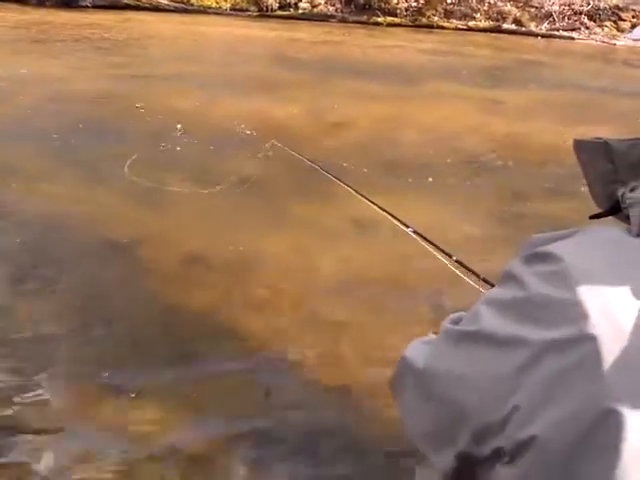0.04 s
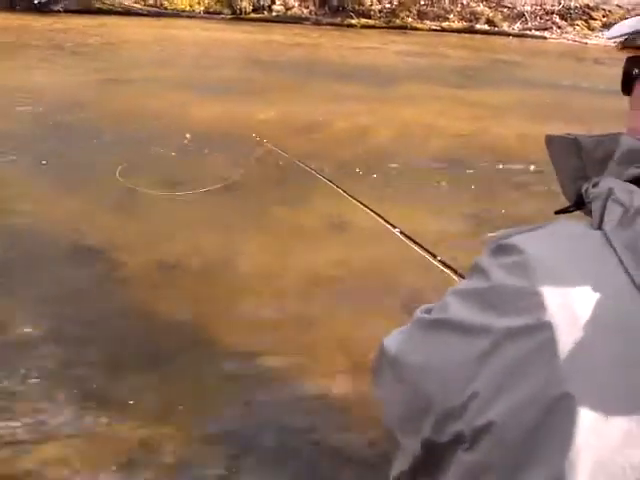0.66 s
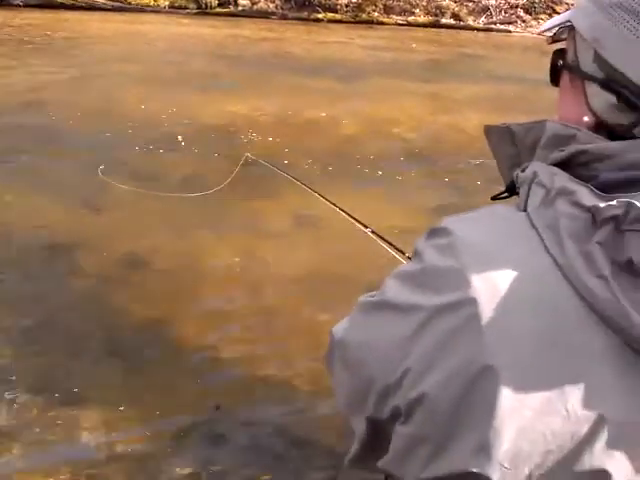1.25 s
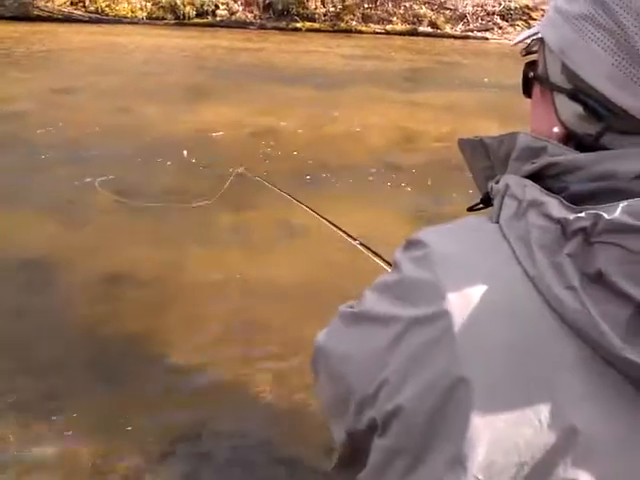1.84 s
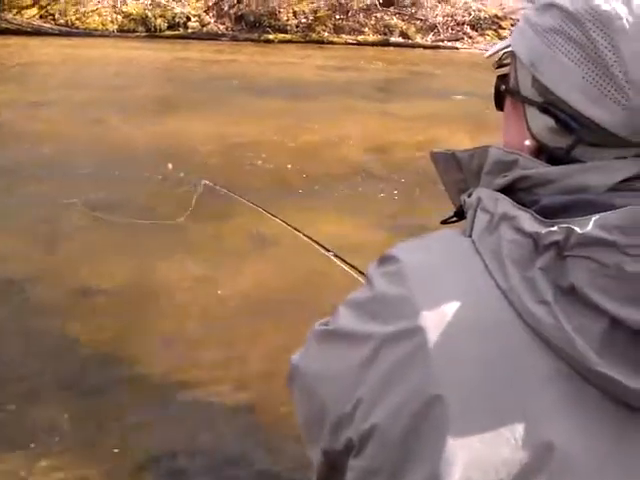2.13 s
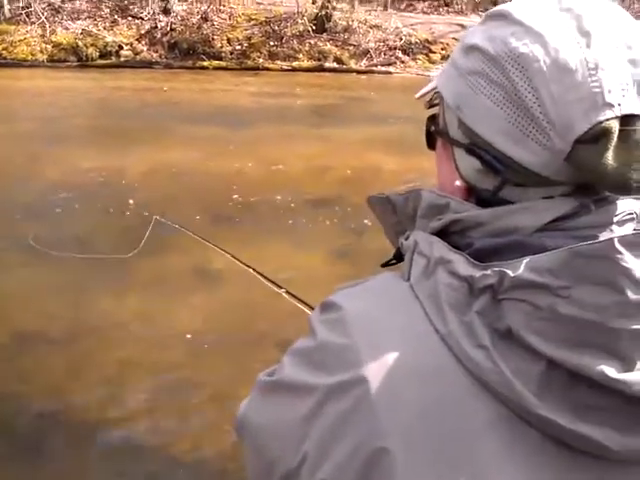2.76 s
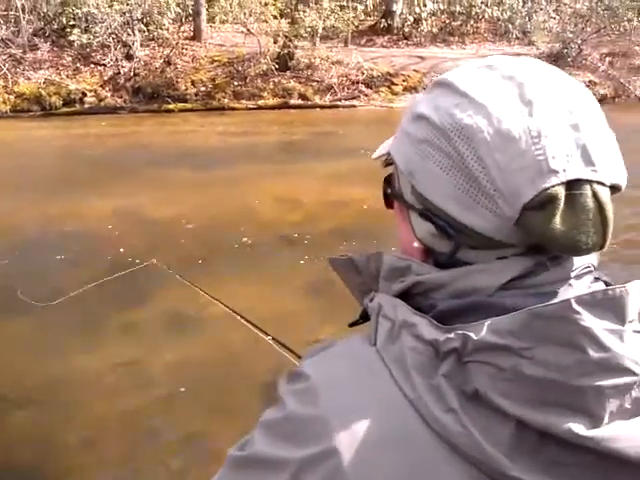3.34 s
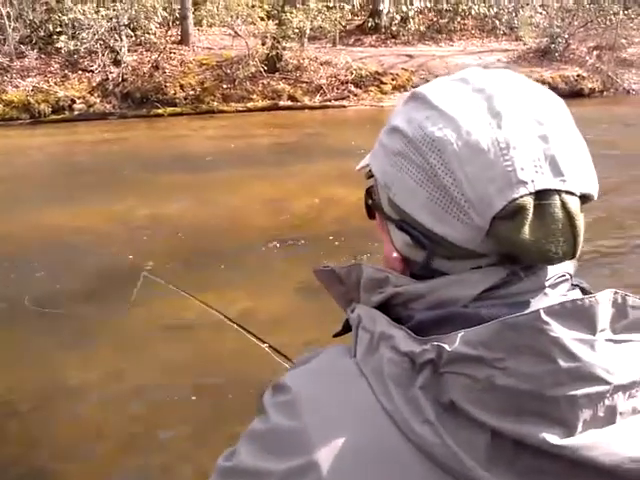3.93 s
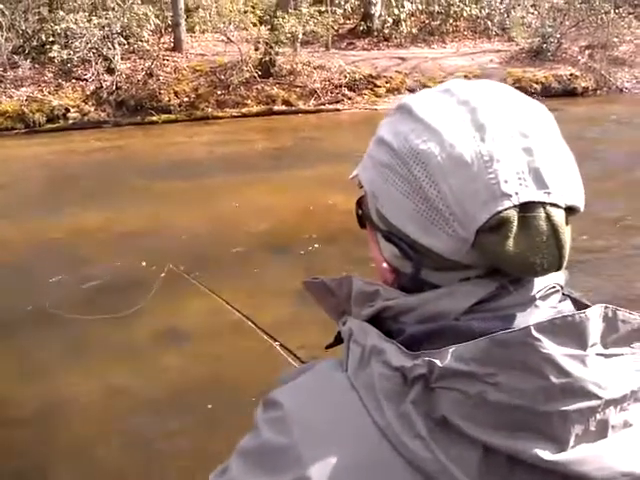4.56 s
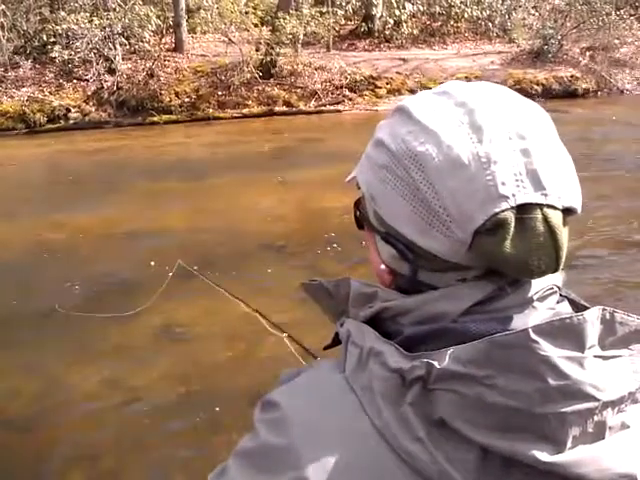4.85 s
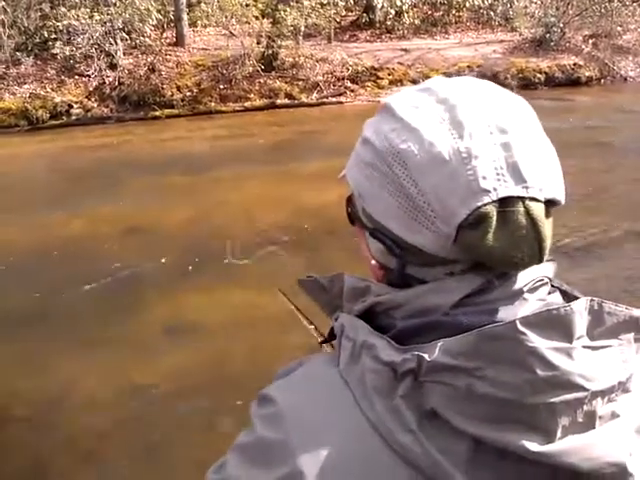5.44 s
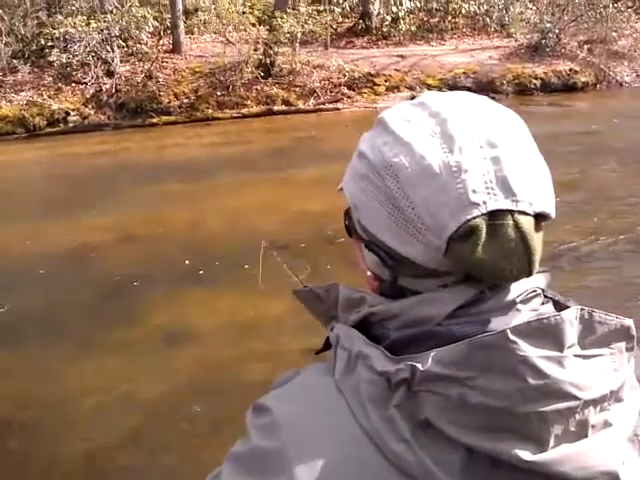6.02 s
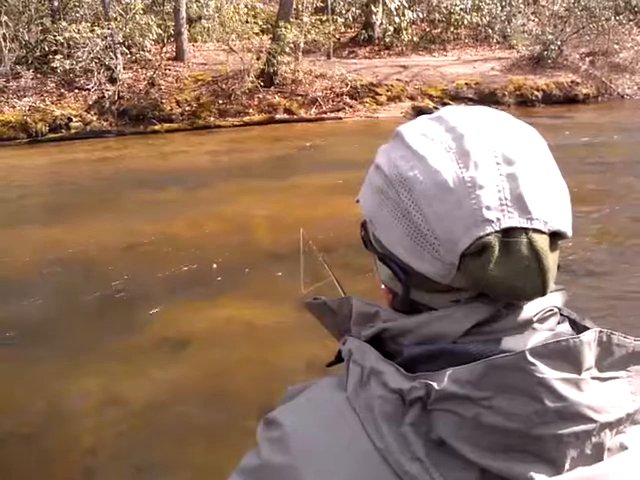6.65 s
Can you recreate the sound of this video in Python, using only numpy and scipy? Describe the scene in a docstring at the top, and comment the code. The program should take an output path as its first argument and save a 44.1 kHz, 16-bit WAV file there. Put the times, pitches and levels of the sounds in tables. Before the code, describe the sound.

Steady rush of a river heard from the bank, with low wind buffets on the microphone that fade near the end.

```python
"""A shallow river rushes past, heard from the water's edge: countless small bubbles ring over a smooth wash.
Each bubble is a damped oscillator, trapped air acting as a spring against the surrounding water. A breeze
carries eddies over the microphone, and their pressure makes a flutter and short low buffets. The wind blows
hardest around two seconds and dies away near the end. After the hardest gust the level dips briefly and creeps
back."""
import sys
import numpy as np
from scipy import signal
from scipy.fft import rfft, irfft, next_fast_len
from scipy.io import wavfile
from scipy.ndimage import map_coordinates

SR = 44100
rng = np.random.default_rng(int(sys.argv[2]) if len(sys.argv) > 2 else 0)


def generate_wav(signal):
    """Clip the signal to [-1, 1] and save it as 16-bit WAV at the path in sys.argv[1]."""
    frames = np.transpose(np.atleast_2d(signal))
    scaled = np.clip(frames, -1, 1) * 32767
    pcm = np.round(scaled).astype(np.int16)
    wavfile.write(sys.argv[1], SR, pcm)


N = 295029

# Strength of the breeze: (time [s], level [dB])
BREEZE_LEVEL = [(0.0, -34), (0.67, -32.5), (1.34, -35.5), (1.54, -44), (1.63, -30), (1.81, -45.5),
                (1.9, -28), (2.22, -25.5), (2.29, -26.5), (2.47, -27), (2.505, -39), (2.74, -45),
                (3.08, -37), (3.29, -40), (3.37, -39), (3.6, -41), (4.18, -42.5), (4.23, -36),
                (4.77, -46.5), (5.1, -36.5), (5.42, -48)]
# Wind pressure for eddies swirling at WIND_HZ: (frequency [Hz], relative level [dB])
WIND_SPECTRUM = [(25, -28), (50, -20), (80, -15.5), (120, -3), (170, 2.5), (260, -5.5), (400, -11.5),
                 (600, -21), (900, -48), (1500, -50), (4000, -96)]
# Largest eddies; few turns thump, many roll: (time [s], level [dB], swirl rate [Hz], length [turns])
LARGE_EDDIES = [(0.112, -21.5, 215, 2.23), (0.143, -29.5, 170, 2.33), (0.244, -21.5, 188, 1.5),
                (0.255, -16.5, 420, 2.04), (0.264, -14, 317, 1.97), (0.295, -19.5, 192, 2.1),
                (0.369, -24.5, 220, 2.7), (0.381, -18.5, 257, 2.84), (0.393, -22, 299, 2.94),
                (0.407, -21, 298, 2.9), (0.487, -30, 201, 4.5), (0.522, -26, 225, 1.9),
                (0.575, -25.5, 200, 2.1), (0.662, -23.5, 264, 2.9), (0.68, -21.5, 198, 3.3),
                (0.697, -24.5, 233, 4), (0.739, -24.5, 182, 3), (0.862, -30.5, 251, 4),
                (0.89, -25.5, 212, 4), (0.924, -27, 218, 2.1), (0.958, -25, 170, 1.6),
                (1.018, -18, 228, 1.94), (1.072, -27, 195, 4), (1.128, -26.5, 255, 3.8),
                (1.18, -30.5, 190, 1.7), (1.248, -26, 200, 3.93), (1.323, -27, 215, 2.6),
                (1.341, -26.5, 218, 3.1), (1.628, -26, 195, 2.16), (1.652, -28.5, 187, 4.6),
                (1.679, -30, 190, 3.1), (1.707, -33.5, 188, 2.4), (1.894, -21.5, 260, 3.1),
                (1.915, -20, 328, 2.6), (1.927, -15, 486, 3.5), (1.946, -17.5, 283, 2.1),
                (1.97, -16, 205, 1.95), (2.008, -22, 235, 3.6), (2.049, -21.5, 198, 2.4),
                (2.068, -23.5, 235, 2.9), (2.104, -17, 230, 2.7), (2.127, -18.5, 340, 1.9),
                (2.161, -14.5, 390, 2.6), (2.176, -16.5, 258, 2.5), (2.203, -18, 287, 3.4),
                (2.216, -16.5, 253, 2.8), (2.228, -19.5, 223, 2.3), (2.331, -24, 250, 2.4),
                (2.365, -15.5, 505, 3.25), (2.381, -17, 340, 3.9), (2.395, -21, 190, 3),
                (2.457, -22, 234, 3.2), (2.471, -22, 244, 3.27), (2.86, -27.5, 198, 1.9),
                (2.882, -30, 205, 2.6), (2.986, -33.5, 190, 2.7), (3.062, -29, 219.5, 2.46),
                (3.099, -29.5, 242, 2.35), (3.129, -30, 230, 2.27), (3.37, -27.5, 228, 3.7),
                (3.39, -27, 240, 3.95), (3.402, -17.7, 325, 1.87), (3.42, -32, 200, 2.5),
                (3.5, -28.5, 209, 3.7), (3.525, -31, 225, 2.6), (3.649, -33.5, 200, 2.7),
                (3.709, -30.5, 195, 1.44), (3.889, -26, 186, 3), (4.056, -29.5, 205, 2.3),
                (4.103, -25, 167, 2.6), (4.217, -27, 198, 2.2), (4.229, -18.5, 210, 2.8),
                (4.27, -27, 281, 4.9), (4.294, -26, 248, 3.5), (4.316, -28.5, 208, 2.4),
                (4.393, -29, 179, 1.7), (4.406, -28, 244, 2.4), (4.427, -29.5, 187, 4.2),
                (4.474, -32.5, 220, 3.6), (4.505, -29, 208, 2.3), (4.603, -32, 208, 5.8),
                (4.688, -34, 180, 5.4), (4.902, -30.5, 150, 2.4), (4.952, -32, 202, 2.2),
                (4.973, -36, 189, 2.1), (5.063, -32, 195, 3.2), (5.101, -27, 155, 2.45),
                (5.253, -36, 175, 2.6)]
# Strength of the river, apart from the brief dip: (time [s], level [dB])
RIVER_LEVEL = [(0, -37), (1.2, -36), (2.3, -37.5), (3.2, -37), (3.9, -35.5), (6.69, -35.5)]
# Rush of the river: (frequency [Hz], relative level [dB])
RUSH_SPECTRUM = [(30, -27), (70, -22.5), (160, -7.5), (300, -3), (460, -4.5), (700, 0), (1100, 1.8),
                 (2000, -0.1), (2500, -4), (3000, -8.5), (4200, -15.5), (5500, -23), (9000, -53)]
# Trickle of nearby ripples: (frequency [Hz], relative level [dB])
TRICKLE_SPECTRUM = [(1500, -8), (3000, 2), (4200, -7), (5500, -13), (6600, -13.5), (9000, -34)]
# Hiss of fine spray: (frequency [Hz], relative level [dB])
SPRAY_SPECTRUM = [(4200, -27), (5400, -3), (6600, 3.3), (7600, 0), (9200, -6.3), (11000, -3), (12700, 0.5),
                  (16000, -3.7)]

WIND_HZ, CALM_S = 202.3, 5.44  # reference swirl rate; time when the air falls calm
TIME = np.arange(N) / SR


def undb(db):
    """Amplitude grows tenfold for every 20 dB."""
    return 10 ** (np.asarray(db) / 20)


def unit(x):
    """Normalisation to rms 1 gives signals equal power."""
    return x / np.sqrt(np.mean(x ** 2) + 1e-18)


def curve(rows, times=TIME):
    """Linear interpolation joins (time, value) rows."""
    return np.interp(times, *np.transpose(rows))


def colour(x, points, shift=1):
    """Filtering multiplies spectra; `shift` scales the frequencies of the response."""
    size = next_fast_len(len(x))
    hz = np.arange(size // 2 + 1) * SR / size
    point_hz, point_db = np.transpose(points)
    response_db = np.interp(np.log(hz / shift + 1), np.log(point_hz), point_db)
    return irfft(rfft(x, size) * undb(response_db), size)[:len(x)]


def wander(rate):
    """Random modulation of rms 1 joins `rate` independent values a second."""
    values = rng.standard_normal(int(N / SR * rate) + 4)
    return unit(map_coordinates(values, [TIME * rate + 1], order=1))


def add(out, x, start):
    """Superposition: x adds to out from sample `start`."""
    a, b = max(start, 0), min(start + len(x), len(out))
    if b > a:
        out[a:b] += x[a - start:b - start]


def breeze(level_db, flutter_db, flutter_rate):
    """Turbulence: the smallest eddies flutter on the microphone until the air falls calm."""
    eddies = rng.standard_normal(N) * undb(flutter_db * np.tanh(wander(flutter_rate)))
    blowing = np.clip((CALM_S - TIME) / 0.054, 0, 1)
    return unit(colour(eddies, WIND_SPECTRUM)) * undb(curve(BREEZE_LEVEL) + level_db) * blowing


def puffs(count, turns, max_db, scatter_db, scatter_octaves):
    """Advection: the breeze carries small eddies about as strong as itself; rows as in LARGE_EDDIES."""
    jitter, strength, swirl = rng.uniform(-0.994, 1, (count, 3)).T
    times = (np.arange(count) + jitter / 2) * CALM_S / count
    db = np.minimum(curve(BREEZE_LEVEL, times) + 0.5 + scatter_db * strength, max_db)
    octaves = (db + 27) / 27 + scatter_octaves * swirl  # stronger puffs swirl faster
    return list(zip(times, db, 192.5 * 2 ** octaves, np.full(count, turns)))


def buffets(eddies, core_share, skirt_db, sag, knock_db, knock_ratio):
    """Turbulent pressure: each eddy is a burst of a few cycles; faster swirls are shorter and higher."""
    out = np.zeros(N)
    size = 4096
    age = (np.arange(size) - size // 2) / SR
    for (time, db, hz, turns), noise in zip(eddies, rng.standard_normal((len(eddies), size))):
        length = turns / hz
        width = core_share * length
        # a sharp core, with a little disturbed air ahead of it and more in its wake
        skirt = np.exp(-np.abs(age) / (np.where(age < 0, 1.56, 2.3) * width))
        envelope = np.exp(-(age / width) ** 2) + undb(skirt_db) * skirt
        pressure = signal.hilbert(colour(noise, WIND_SPECTRUM, hz / WIND_HZ))
        # the swirl holds its strength, running faster at the front and slower in the wake
        swirl = pressure.real / (np.abs(pressure) + np.std(pressure.real) / 2)
        swirl = np.interp(age + sag * length * np.exp(-(age / length) ** 2), age, swirl)
        phase = 2 * np.pi * knock_ratio * hz * age
        knock = phase * np.exp((1 - phase ** 2) / 2)  # one pressure swing, signed below to aid the swirl
        burst = envelope * swirl + np.copysign(undb(knock_db), knock @ swirl) * knock
        gain = undb(db) * np.sqrt(length * SR / np.sum(burst ** 2))
        add(out, gain * burst, int(time * SR) - size // 2)
    # the microphone passes little deep bass, and the smallest eddies cancel across its port
    out = signal.sosfilt(signal.butter(3, 85, "high", fs=SR, output="sos"), out)
    return signal.sosfilt(signal.butter(4, 920, fs=SR, output="sos"), out)


def spray(flicker_db, swell_db):
    """Amplitude-modulated noise: fine spray hisses with a fast flicker and a slower swell."""
    fizz = rng.standard_normal(N) * undb(flicker_db * wander(300) + swell_db * wander(14))
    return unit(colour(fizz, SPRAY_SPECTRUM))


def wash(flicker_db, flicker_rate, surge_db):
    """Incoherent summation: far riffles merge into noise whose bands surge together and flicker alone."""
    spectrum = rfft(rng.standard_normal(next_fast_len(N, real=True)))
    hz = np.linspace(0, SR / 2, len(spectrum))
    edges = np.r_[0, np.geomspace(200, SR / 2, 14)]
    bands = (irfft(spectrum * ((hz >= lo) & (hz < hi)))[:N] for lo, hi in zip(edges, edges[1:]))
    flickering = sum(band * undb(flicker_db * wander(flicker_rate)) for band in bands)
    return unit(flickering * undb(surge_db * wander(2.98)))


def bubbles(count, low_hz, high_hz, cycles, glide, scatter_db):
    """Damped resonance: trapped air rings, rising in pitch as each bubble nears the surface."""
    out = np.zeros(N)
    for when, pitch, strength, life in rng.random((count, 4)):
        hz = low_hz * (high_hz / low_hz) ** pitch
        decay = cycles * (.5 + life) / hz
        age = np.arange(int(5 * decay * SR)) / SR
        ring = np.sin(2 * np.pi * hz * age * (1 + glide * age / decay)) * np.exp(-age / decay)
        # a few bubbles are much louder than the rest; the factor hz evens out the energy per Hz
        gain = hz * undb(-scatter_db * np.log(strength + 0.028))
        add(out, gain * ring, int(when * N))
    return unit(out)


def dip(deepest_s, depth_db, fall_s, recover_s):
    """Exponential recovery: the level in dB falls quickly, then creeps back."""
    since = TIME - deepest_s
    fall = np.clip(1 + since / fall_s, 0, 1)
    recovery = np.exp(-np.maximum(since, 0) / recover_s)
    return undb(depth_db * fall * recovery)


def river():
    """Independent sources add in power: wash and bubbles form the rush, with trickle and spray above."""
    riffles = wash(flicker_db=0.67, flicker_rate=18, surge_db=0.13)
    babble = bubbles(count=9000, low_hz=447.4, high_hz=4545, cycles=5.2, glide=0.017, scatter_db=2.5)
    rush = unit(unit(colour(riffles, RUSH_SPECTRUM)) + undb(-7.5) * unit(colour(babble, RUSH_SPECTRUM)))
    ripples = bubbles(count=800, low_hz=2414, high_hz=7430, cycles=38, glide=0.01, scatter_db=2.5)
    trickle = undb(-21.5) * unit(colour(ripples, TRICKLE_SPECTRUM))
    hiss = undb(-17.6) * spray(flicker_db=1.3, swell_db=0.45)
    return (rush + trickle + hiss) * undb(curve(RIVER_LEVEL))


def scene():
    """Superposition: the pressures of river and wind add at one microphone."""
    water = river() * dip(deepest_s=2.41, depth_db=-10.5, fall_s=0.034, recover_s=0.18)
    flutter = breeze(level_db=-2, flutter_db=3.0, flutter_rate=50)
    eddies = LARGE_EDDIES + puffs(count=105, turns=2.39, max_db=-28, scatter_db=2, scatter_octaves=0.23)
    thumps = buffets(eddies, core_share=0.52, skirt_db=-4.5, sag=0.309, knock_db=-6.5, knock_ratio=1.3)
    return (water + flutter + thumps)[None]


def record(dry):
    """Band limiting: a steep low-pass filter removes the highest treble."""
    return signal.sosfilt(signal.ellip(10, .2, 80, 15850, fs=SR, output="sos"), dry)


dry = scene()
out = record(dry)
generate_wav(out)
```